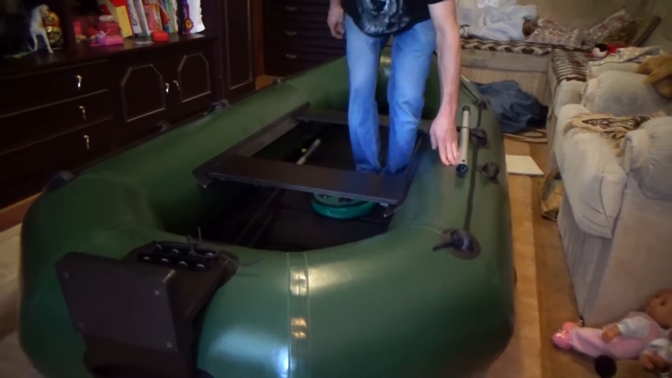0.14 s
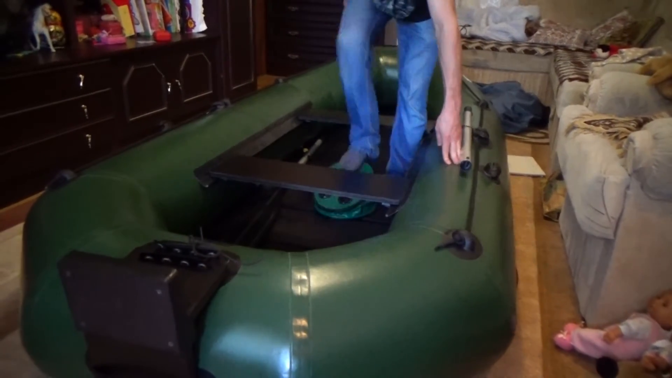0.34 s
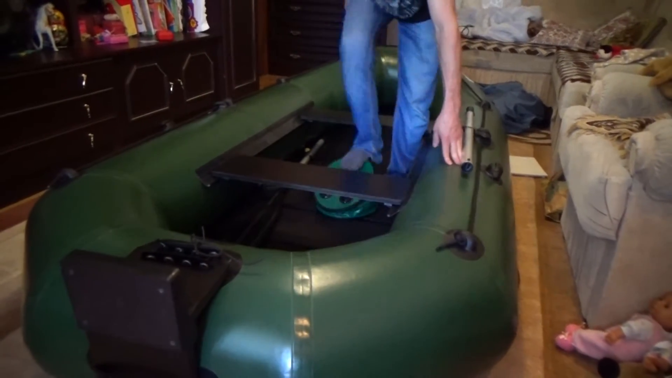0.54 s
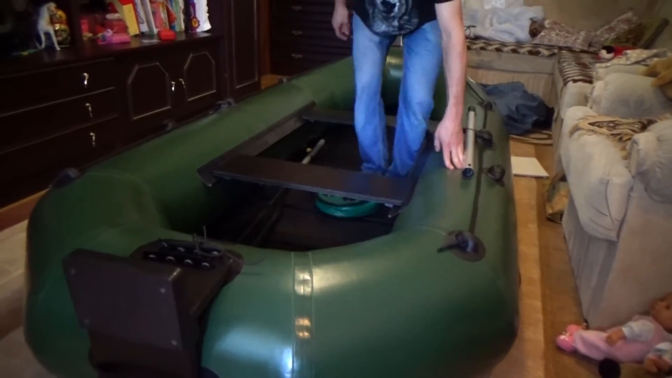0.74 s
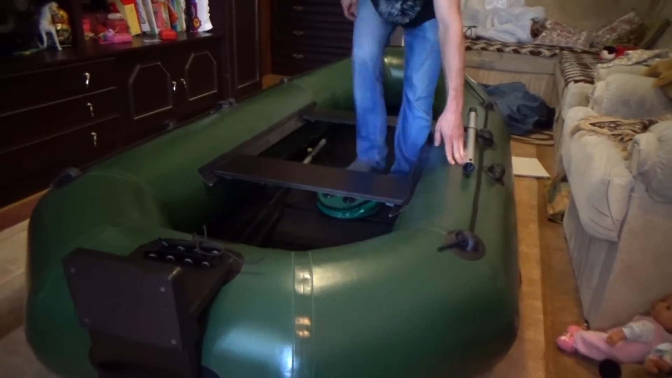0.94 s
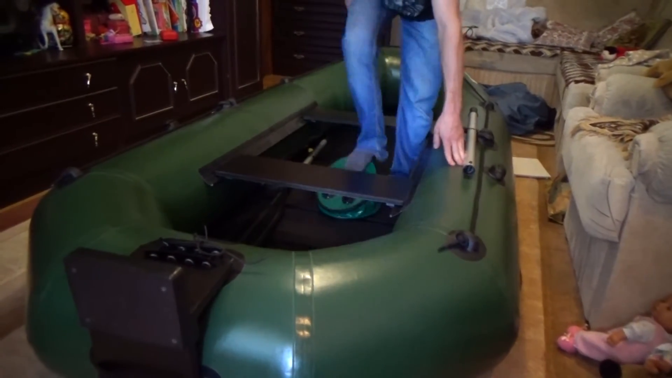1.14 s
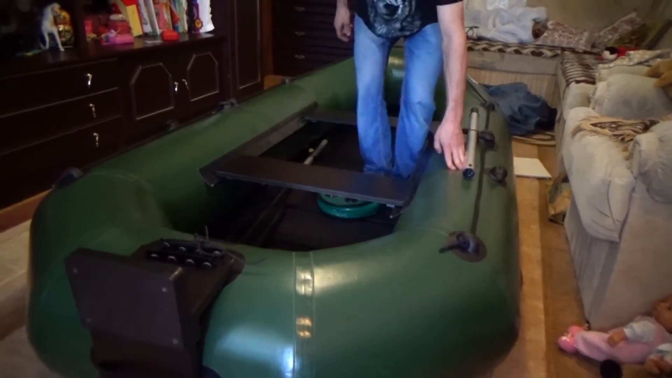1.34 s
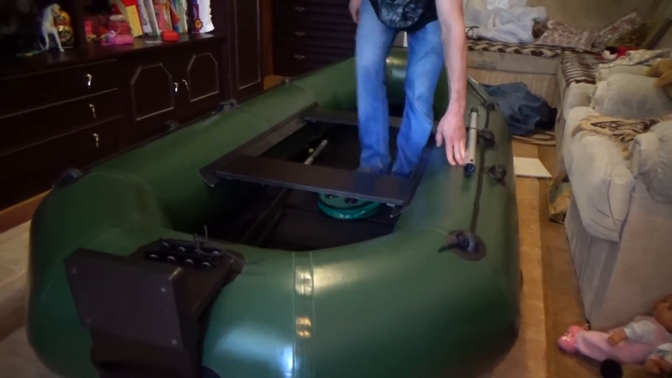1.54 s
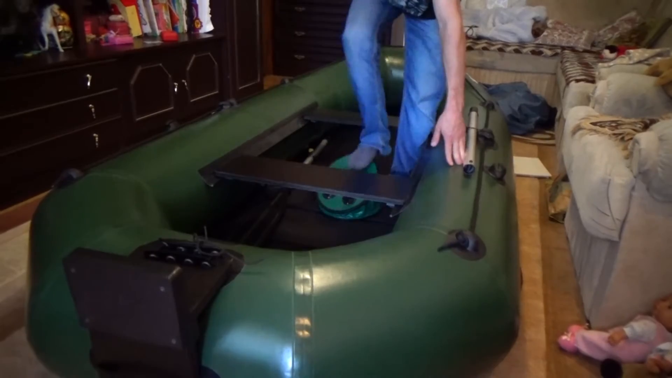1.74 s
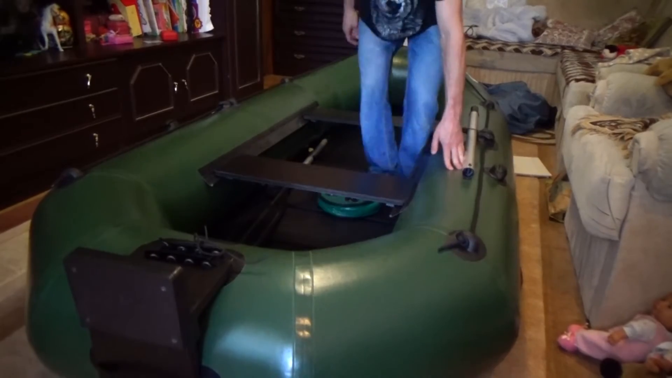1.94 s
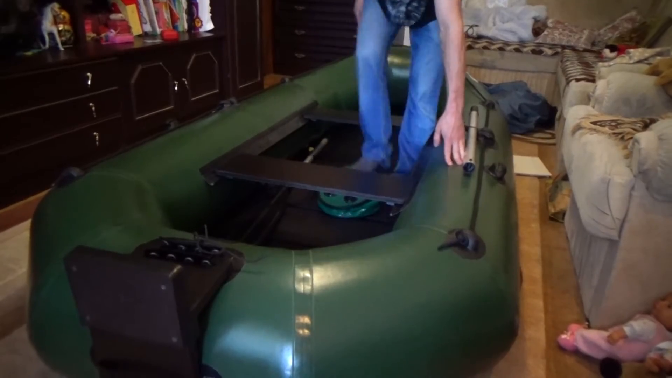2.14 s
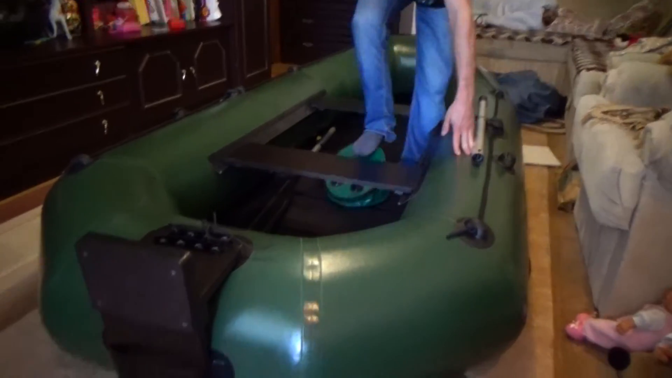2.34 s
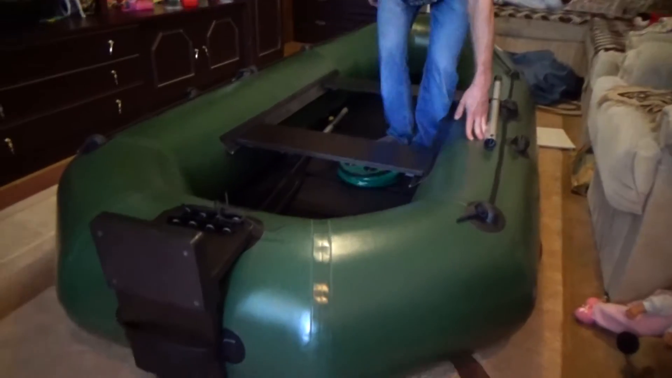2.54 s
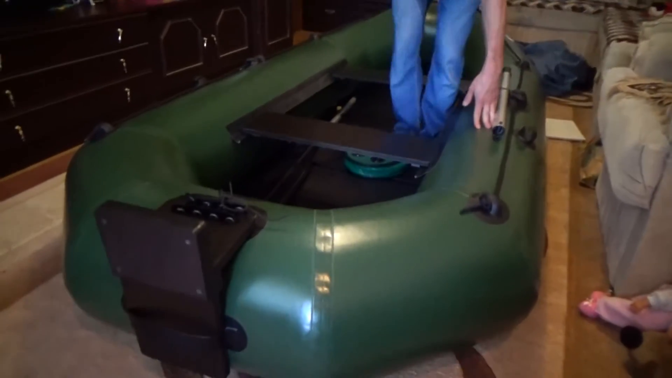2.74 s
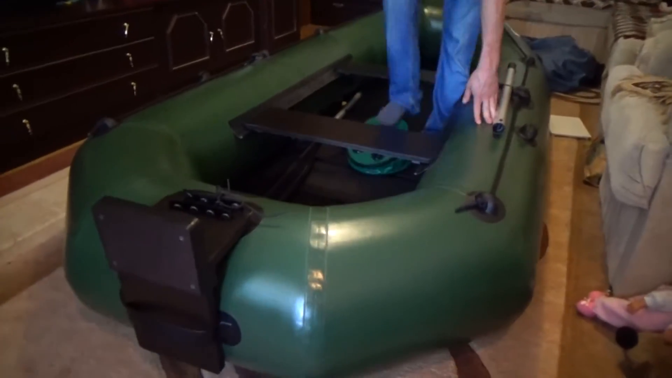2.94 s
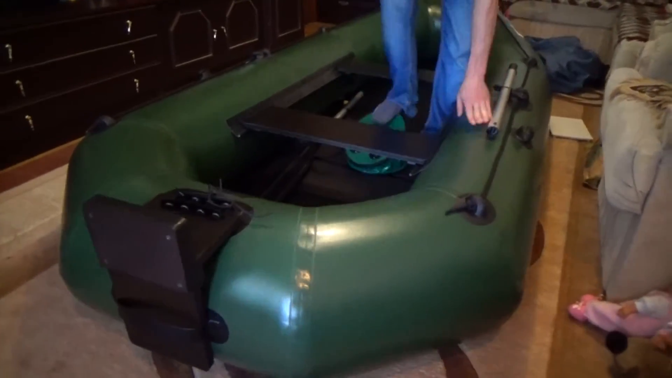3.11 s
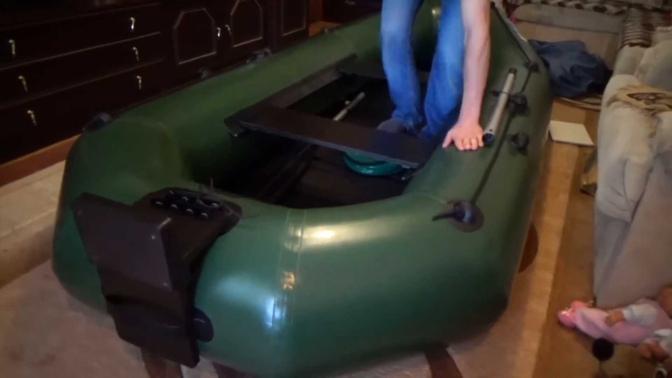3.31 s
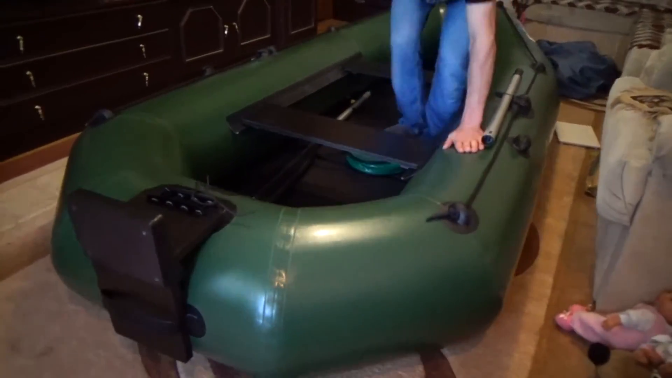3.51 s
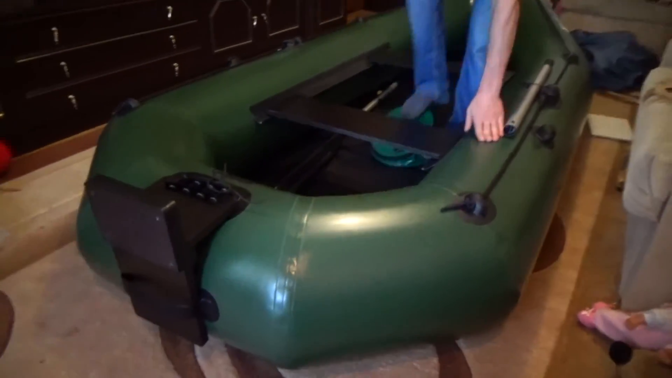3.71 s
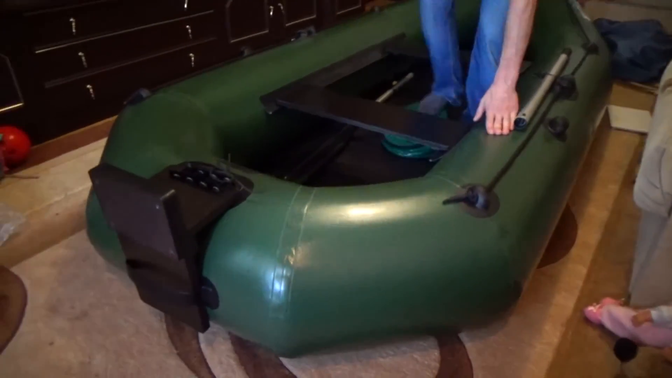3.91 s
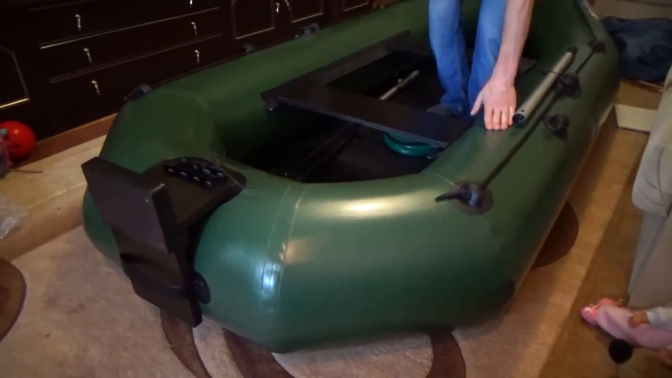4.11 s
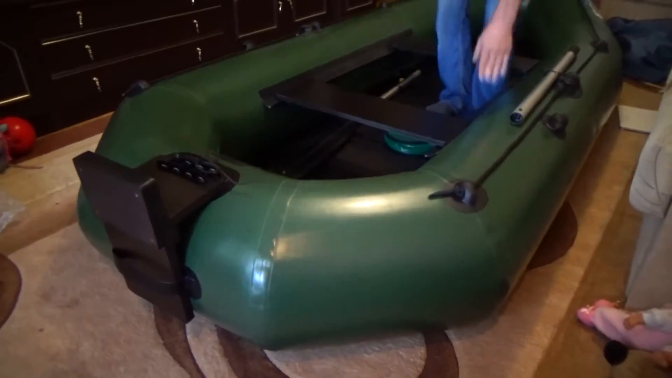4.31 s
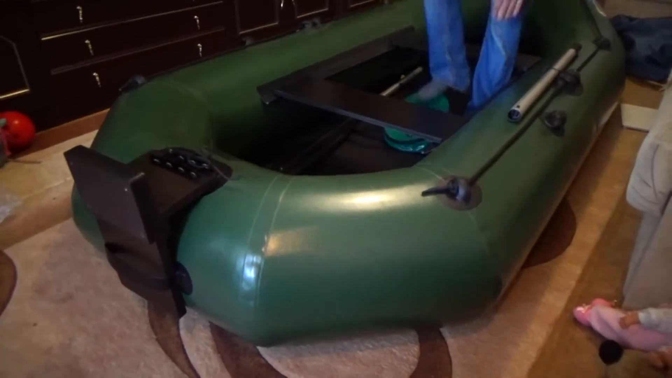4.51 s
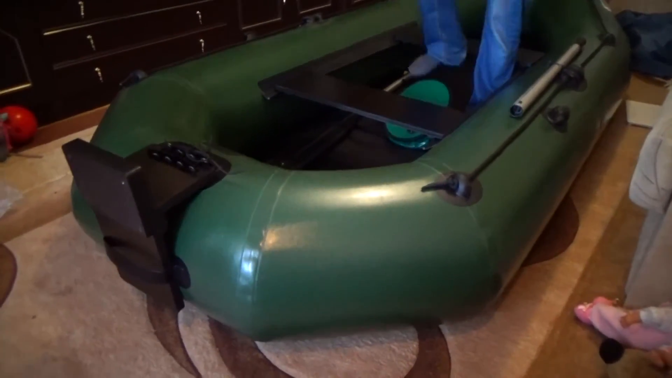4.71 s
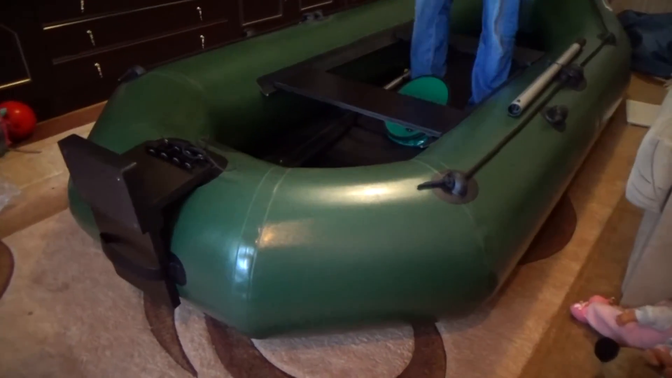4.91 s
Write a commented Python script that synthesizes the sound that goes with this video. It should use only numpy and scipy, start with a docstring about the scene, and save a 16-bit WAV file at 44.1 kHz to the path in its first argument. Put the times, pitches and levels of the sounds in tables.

```python
"""Foot pump and rubber boat

A bellows foot pump inflates a rubber boat in a furnished living room, seven presses, straight ahead.
Each press crumples the bellows (dense slips rung in the hull) and jets noisy air through a ribbed hose,
which whistles in sliding sine tones on its pipe modes, lower when the push is gentler. Each lift unfolds
the bellows and sucks air in. Buckling folds, rubs and plastic clicks intervene; the room answers softly."""
import sys
import numpy as np
from scipy import signal
from scipy.fft import rfft, irfft, next_fast_len
from scipy.io import wavfile
from scipy.ndimage import uniform_filter1d, minimum_filter1d, map_coordinates

SR = 44100
rng = np.random.default_rng(int(sys.argv[2]) if len(sys.argv) > 2 else 0)


def store_wav(level_fs):
    """Save 16-bit WAV to argv[1]."""
    pcm = np.round(np.clip(np.atleast_2d(level_fs), -1, 1) * 32767)
    wavfile.write(sys.argv[1], SR, pcm.T.astype(np.int16))


N = 223119

# All levels in the tables are relative: each layer has its own gain in the mix.
# foot coming up: start_s, bellows_db, swell_s, crumple_hold_s, intake_length_s, intake_db
FOOT_LIFTS = [ (-0.24, -24, .05, .03, 0.292, -24), (0.304, -16, 0.049, 0.017, 0.27, -28),
              (0.98, -13.5, 0.035, 0.026, 0.23, -29), (1.606, -14, 0.043, 0.031, 0.22, -28),
              (2.172, -15, 0.035, 0.049, 0.25, -29), (2.914, -14, 0.043, 0.048, 0.3, -27.5),
              (3.7, -14.5, 0.041, 0.038, .21, -28.5), (4.5, -15.5, 0.087, 0.028, .42, -31)]
# foot going down: start_s, bellows_db, crumple_hold_s, flow_rise_s, flow_fall_s, fall_taper (exponent),
# hiss_db, jet_db
FOOT_PRESSES = [ (0.0, -10, 0.024, .10, 0.25, 1.3, -24, -24.5),
                (0.597, -13.5, 0.031, 0.14, 0.26, 1.26, -23.5, -24.5),
                (1.216, -11.5, 0.02, 0.13, 0.31, 2, -22.5, -23.5),
                (1.833, -12, 0.032, .12, 0.28, 1.96, -21.5, -24),
                (2.449, -9.5, 0.018, 0.16, 0.34, 1.49, -21.5, -27),
                (3.201, -17.5, 0.047, 0.3, 0.25, 1.73, -23.5, -34.5),
                (3.929, -12, 0.031, 0.15, 0.52, 1.75, -22, -37)]
# the hose sings on a pipe mode: start_s, length_s, pitch_hz, level_db, fade_db_per_s, octave_db
HOSE_TONES = [ (0.096, 0.27, 4120, -13.5, 51, -5.5), (0.718, 0.25, 4136, -25, 23, 3.5),
              (0.728, 0.21, 3995, -16.5, 36, 0), (0.80, 0.079, 3866, -21, 6, -22),
              (1.322, 0.25, 4134, -22.5, 31, -12), (1.339, 0.073, 3980, -13, 20, -5.5),
              (1.388, .22, 3855, -18.5, 67, -20), (1.93, .25, 4124, -17, 32, -1),
              (1.928, 0.092, 3992, -21, 27, 2.5), (2.018, 0.017, 4105, -9, 10, -34),
              (2.57, 0.172, 3415, -15.5, 39, -11), (2.606, .165, 3153, -19.5, 28, -10),
              (3.445, 0.065, 2490, -28, 14, -17), (3.523, 0.071, 2428, -21.5, 140, -28),
              (4.086, 0.1, 2745, -27.5, 120, -13), (4.087, 0.041, 2590, -28, 10, -37),
              (4.088, 0.052, 2420, -32, 8.5, -24)]
# foot and hand rub on the pump and hull: start_s, length_s, low_db, creak_db
RUBBER_RUBS = [(0.448, 0.037, -16.5, -32), (3.151, 0.009, -14.5, -23), (3.293, 0.11, -30, -40),
               (3.565, 0.2, -28.5, -37.5), (4.144, 0.013, -22, -25), (4.19, 0.005, -19, -24),
               (4.395, 0.06, -30, -37)]
# a fold of the bellows buckles: start_s, level_db
FOLD_BUCKLES = [(0.607, -11.5), (1.203, 3), (1.825, -2), (2.44, -1.5), (3.196, -5), (3.911, -3.5),
                (5.012, -24.5)]
# the plastic pump and the fittings click: start_s, level_db, knock_db, treble_db
PLASTIC_CLICKS = [(0.646, -15.5, -21, -7), (1.2434, -15, -21, -3), (1.6194, -39, -1, -7),
                  (1.8019, -19, -9, 7.5), (1.856, -16, -21.5, -14.5), (2.168, -29.5, -15, -11),
                  (2.4897, -15, -17, -6), (2.9346, -10.5, 4, -1), (3.157, -8, -11, -26.5),
                  (3.25, -13.5, -10, 0.5), (3.342, -13, -10, -8), (3.4285, -13.5, -12.5, 1),
                  (3.6355, -17, -2, -15), (4.1356, -19, -16, -12), (4.1987, -18, 17, 5),
                  (4.394, -17, -3.5, -15), (4.4866, -17, -15, 2), (4.5424, -21, -18, 6.5),
                  (4.6134, -16, -11, 5.5)]
# resonances of the air-filled bellows: pitch_hz, level_db, t60_s
BELLOWS_MODES = [(138, -18, 0.14), (219, -1, 0.14), (254.6, 3.5, 0.18), (284, -7.5, 0.031),
                 (411.7, -5.5, 0.14), (641, -12, 0.071)]
# lowest resonances of boat and room: pitch_hz, level_db, t60_s
BOOM_MODES = [(132.7, -21, 0.5), (208.1, 0, 0.57), (251, -14.5, 0.39), (401, -25.5, 0.2)]
# resonances of boat and room that colour the rubber: centre_hz, width_hz, boost_db
HULL_RESONANCES = [(128.3, 11, 5), (208.4, 4.7, 6.5), (249, 34, 2), (311, 45, 2.5), (405.2, 21, 4.5),
                   (487, 72, 4.5), (604, 8.1, 3.5), (656.4, 30, 8.5)]
# spectrum of the bellows crumpling: frequency_hz, level_db
FOLDING_SPECTRUM = [(25, -79), (55, -20), (85, -21.5), (130, -2.5), (240, -3.5), (340, -3), (460, -5.5),
                    (700, -15.5), (950, -15), (1300, -23.5), (2700, -34), (5000, -46), (9000, -49)]
# spectrum of the bellows springing open: frequency_hz, level_db
UNFOLDING_SPECTRUM = [(24, -53), (40, -64), (64, -22), (93, -27.5), (122, -5), (233, 2.5), (312, -4.5),
                      (403, -4.5), (540, -10.5), (649, -16.5), (752, -16.5), (1030, -15), (1210, -24.5),
                      (1680, -22.5), (3200, -37.5), (4160, -57), (7040, -120)]
# spectrum of air sucked through the inlet: frequency_hz, level_db
INTAKE_SPECTRUM = [(410, -13.5), (700, 2), (767, -24), (829, -4), (1130, -1), (1230, -4.5), (1510, -3),
                   (2180, -4), (2820, -7), (4020, -7), (5790, -16.5), (7710, -7), (8900, -12.5),
                   (12200, -7.5), (15800, -14)]
# spectrum of the bright hiss of the outflow: frequency_hz, level_db
HISS_SPECTRUM = [(1500, -20), (4000, -18), (6000, -5), (7500, 0), (9000, 4), (11300, 0), (12300, 7.5),
                 (14000, 3), (16000, 0.5)]
# spectrum of the air jet: frequency_hz, level_db
JET_SPECTRUM = [(700, -22.5), (1300, -8), (2000, -10), (3000, 1), (4300, -1), (5200, -3.5), (7000, -3),
                (9000, -3.5), (14000, -10.5)]
# spectrum of the knocked plastic: frequency_hz, level_db
CASING_SPECTRUM = [(120, -36.5), (200, 7.5), (616, 8), (1060, -6), (1370, -4), (2120, -12), (2380, -13.5),
                   (2990, -15.5), (3300, -14.5), (3860, -24), (4140, -25), (4710, -24.5), (6000, -28),
                   (7800, -49), (13200, -120)]
# spectrum of the steady background noise: frequency_hz, level_db
BACKGROUND_SPECTRUM = [(25, -45), (60, -7), (120, 3.5), (250, -7), (600, 0.5), (1500, -1.5), (4000, -10.5),
                       (16000, -30)]
# reverberation of the living room: frequency_hz, t60_s
ROOM_DECAY = [(150, 0.23), (1000, 0.27), (4000, 0.49), (9000, 0.48), (15000, 0.11)]
# stereo spread: frequency_hz, side_db
SIDE_SPECTRUM = [(70, 7), (150, -20), (500, -15), (1200, -24.5), (2400, -48), (4000, -27), (8000, -12),
                 (12000, -31.5)]

FOLD_RISE_DB_PER_S, FOLD_FALL_DB_PER_S = 438, 219  # crumpling under the foot
UNFOLD_START_DB, UNFOLD_FALL_DB_PER_S = -9.5, 250  # the bellows spring open, swell and settle
RUB_RISE_DB_PER_S, RUB_FALL_DB_PER_S = 1200, 302  # this rise also serves the unfolding
SETTLE_DB, SETTLE_DB_PER_S = -29.5, 20  # the rubber keeps stirring faintly after each movement
JET_GROWS, CREASE_GROWS = 1.02, 0.91  # exponents: jet against flow, small creases against big folds
INTAKE_SAG_DB_PER_S, INLET_CLOSE_S = 48, 0.033  # suction fades as the bellows fill
SHARP_HZ, SHARP_SETTLES_S = 41.3, 0.027  # each tone starts sharp and slides down onto its mode
SWELL_S = 0.025  # longest build-up of a tone in the hose, counted from its nominal start
# the octave is strongest early in a tone, then fades to a faint floor
OCTAVE_HOLD_S, OCTAVE_FADE_DB_PER_S, OCTAVE_LEAST_DB = 0.026, 218, -27
TOP_HZ = 15900  # upper band limit


def amp(db):
    """Decibels to gain."""
    return 10 ** (np.asarray(db) / 20)


def unit(x):
    """Scale to rms 1."""
    return x / np.sqrt(np.mean(x ** 2) + 1e-20)


def along(points, hz):
    """Interpolate (Hz, value) points on a logarithmic frequency axis."""
    f, v = np.transpose(points)
    return np.interp(np.log(hz + 1), np.log(f), v)


def since(s):
    """Seconds since s, for every sample."""
    return np.arange(N) / SR - s


def wobble(rate, size=N):
    """A smooth random curve with rate knots a second."""
    knots = rng.standard_normal(int(size * rate / SR) + 4)
    return map_coordinates(knots, [np.arange(size) * rate / SR])


def coloured(x, gain_db):
    """Filter x causally (minimum phase) with a gain in dB given as a function of frequency."""
    m = 2 * next_fast_len(x.shape[-1] // 2 + 4096)
    cepstrum = irfft(np.log(amp(gain_db(np.fft.rfftfreq(m, 1 / SR))) + 1e-6), m)
    # folding the cepstrum forward in time makes the filter causal
    cepstrum[1:m // 2] *= 2
    cepstrum[m // 2 + 1:] = 0
    return irfft(rfft(x, m) * np.exp(rfft(cepstrum)), m)[..., :x.shape[-1]]


def rush(spectrum):
    """Turbulent air as shaped noise of rms 1."""
    return unit(coloured(rng.standard_normal(N), lambda hz: along(spectrum, hz)))


def add(track, s, sound):
    """Mix a sound into the track at s seconds."""
    part = track[max(round(s * SR), 0):][:len(sound)]
    part += sound[:len(part)]


def movement(t, hold, rise, fall):
    """Gain of moving rubber: rise and fall in dB per s around a hold, then faint settling."""
    before, after = np.maximum(-t, 0), np.maximum(t - hold, 0)
    settling = amp(SETTLE_DB - SETTLE_DB_PER_S * after)
    return amp(-rise * before) * np.maximum(amp(-fall * after), settling)


def crumple(spectrum, rate, spread_db, rub):
    """Dense slips of the rubber ring in the hull: big folds sound low, small creases higher."""
    sizes = amp(spread_db * rng.standard_normal(N))
    slips = (rng.random(N) < rate / SR) * rng.choice([-1, 1], N) * sizes  # rate in slips per s
    drive = unit(slips) + rub * rng.standard_normal(N)

    def hull(hz):
        """Rubber spectrum in dB with the resonances of boat and room on top."""
        peaks = sum(db / (1 + (2 * (hz - centre) / width) ** 2) for centre, width, db in HULL_RESONANCES)
        return along(spectrum, hz) + peaks

    low_tilt = [(440, 19), (600, -22.0), (1000, -3.5)]
    high_tilt = [(250, -22.0), (420, -19.5), (540, 15)]
    folds = coloured(drive, lambda hz: hull(hz) + along(low_tilt, hz))
    creases = coloured(np.roll(drive, SR // 200), lambda hz: hull(hz) + along(high_tilt, hz))
    return unit(folds), unit(creases)


def lift():
    """The spring unfolds the bellows while air is sucked through the inlet."""
    unfolding, intake = 0, 0
    for s, db, swell, hold, length, intake_db in FOOT_LIFTS:
        t = since(s)
        opening = np.clip(t / swell, 0, 1)
        stir = movement(t, swell + hold, RUB_RISE_DB_PER_S, UNFOLD_FALL_DB_PER_S)
        unfolding = unfolding + amp(db + UNFOLD_START_DB * (1 - opening)) * stir
        closing = np.clip((length - t) / INLET_CLOSE_S, 0, 1)
        suction = amp(intake_db - INTAKE_SAG_DB_PER_S * np.maximum(t - swell, 0))
        intake = intake + suction * opening ** 1.1 * closing
    folds, creases = crumple(UNFOLDING_SPECTRUM, rate=800, spread_db=3.0, rub=0.5)
    air = amp(4.5 + 0.75 * wobble(50)) * intake * rush(INTAKE_SPECTRUM)
    return amp(-0.5) * unfolding * folds + amp(-11) * unfolding ** CREASE_GROWS * creases + air


def airflow():
    """Gains of hiss and jet: flow builds as the foot sinks and tapers off as the bellows empty."""
    hiss, jet = 0, 0
    for s, _, _, rise, fall, taper, hiss_db, jet_db in FOOT_PRESSES:
        t = since(s)
        sinking = np.clip(t / rise, 0, 1)
        emptying = np.clip(1 - (t - rise) / fall, 0, 1) ** taper
        flow = np.sin(np.pi / 2 * sinking) ** 1.09 * emptying
        hiss = hiss + amp(hiss_db) * flow
        jet = jet + amp(jet_db) * flow ** JET_GROWS * sinking ** 2.04
    return hiss, jet


def press(hiss, jet):
    """The bellows fold, then air jets through the valve; a slackening jet loses its lower roar first."""
    folding = sum(amp(db) * movement(since(s), hold, FOLD_RISE_DB_PER_S, FOLD_FALL_DB_PER_S)
                  for s, db, hold, *_ in FOOT_PRESSES)
    creasing = np.pad(folding, (int(0.0073 * SR), 0))[:N] ** CREASE_GROWS  # creases lag by 7.3 ms
    folds, creases = crumple(FOLDING_SPECTRUM, rate=590, spread_db=2.0, rub=0.63)
    flow = jet / jet.max()
    roar_spectrum = [(900, -35.5), (1300, -5.5), (1800, 6), (2800, 4.5), (4500, -11)]
    roar = flow ** 1.47 * amp(-24.5) * rush(roar_spectrum)
    air = amp(-2.5) * hiss * rush(HISS_SPECTRUM) + amp(4) * jet * rush(JET_SPECTRUM) + roar
    rubber = amp(-5.0) * folding * folds + amp(-13.5) * creasing * creases
    return rubber + air * amp(0.15 * wobble(42))


def whistle(jet, edge=.014, flutter_db=3.0, spacing_hz=138, side_tone_db=-11, breath_db=-10):
    """The hose slides onto a pipe mode and fades there; the tone clears as the jet slackens."""
    out = np.zeros(N)
    for start, length, hz, db, fade, octave_db in HOSE_TONES:
        size = int((length + 2 * edge) * SR)
        t = np.arange(size) / SR - edge
        flow = np.interp((start + t) * SR, np.arange(N), jet / jet.max())
        building = (t + edge) / (edge + min(SWELL_S, length / 2))
        ending = (length + edge - t) / (2 * edge)
        swell = np.sin(np.pi / 2 * np.clip(np.minimum(building, ending), 0, 1)) ** 1.3

        jitter = .005 * flow ** .5 * wobble(220, size)
        sharp = SHARP_HZ * np.exp(-np.maximum(t, 0) / SHARP_SETTLES_S)
        phase = 2 * np.pi * np.cumsum(hz * (1 + jitter) + sharp) / SR

        # a strong jet also roughens the tone with wavering side tones and a breathy skirt
        side_tones = 0
        for k in (-3.5, -2.1, -0.22, 3.7):  # offset in units of spacing_hz
            level = amp(side_tone_db * abs(k) ** .5) * (1 + wobble(45, size))
            offset = 2 * np.pi * (k * spacing_hz * t + rng.random())
            side_tones = side_tones + level * np.sin(phase + offset)
        skirt = wobble(851, size) * np.sin(phase) + wobble(799, size) * np.cos(phase)
        breath = amp(breath_db) * skirt

        shiver = 1.1 * flow * wobble(350, size)
        octave_fade = OCTAVE_FADE_DB_PER_S * np.maximum(t - OCTAVE_HOLD_S, 0)
        overblow = amp(OCTAVE_LEAST_DB) + amp(octave_db - octave_fade)
        octave = overblow * amp(1.5 * wobble(133, size)) * np.sin(2 * phase + shiver)

        tone = np.sin(phase) + flow * (side_tones + breath) + octave
        level = amp(db - fade * t + flutter_db * wobble(135, size))
        add(out, start - edge, swell * level * tone)
    return amp(1.5) * out


def rubs():
    """Short scuffs of foot and hand make the rubber slip, mostly during the last two presses."""
    folds, creases = crumple(FOLDING_SPECTRUM, rate=680, spread_db=1.5, rub=0.48)
    out = 0
    for s, length, low_db, creak_db in RUBBER_RUBS:
        scuff = amp(low_db - 9) * folds + amp(creak_db - 4.0) * creases
        out = out + movement(since(s), length, RUB_RISE_DB_PER_S, RUB_FALL_DB_PER_S) * scuff
    return out


def buckles(attack=.005):
    """A fold gives way under the foot and the air-filled bellows boom briefly in decaying sines."""
    out, t = np.zeros(N), np.arange(SR // 3) / SR
    for s, db in FOLD_BUCKLES:
        ring = 0
        for hz, level, t60 in BELLOWS_MODES:
            decay = amp(level + rng.standard_normal() - 60 * t / t60)  # each mode varies by about 1 dB
            ring = ring + decay * np.sin(2 * np.pi * (hz * t + rng.random()))
        ring = ring * (1 - np.exp(-t / attack))
        add(out, s, amp(db - 4) * ring / np.abs(ring).max())
    return out


def clicks(t60=0.054):
    """Dry knocks of hard plastic: decaying noise with its own weight, plus a shorter treble crack."""
    out, t = np.zeros(N), np.arange(SR // 8) / SR
    for s, db, knock_db, treble_db in PLASTIC_CLICKS:
        burst = rng.standard_normal(len(t)) * amp(-60 * t / t60)
        weight = [(600, knock_db), (1200, 0)]
        body = coloured(burst, lambda hz: along(CASING_SPECTRUM, hz) + along(weight, hz))
        edge = [(2000, -17), (5000, -1), (15000, 2.0)]
        crack = coloured(burst * amp(-500 * t), lambda hz: along(edge, hz))
        add(out, s, amp(db - 19) * unit(body) + amp(db + treble_db - 28.5) * unit(crack))
    return out


def boom(x):
    """The lowest resonances of boat and room ring on after the foot comes down."""
    t = np.arange(SR // 2) / SR
    ring = 0
    for hz, db, t60 in BOOM_MODES:
        resonance_scale = 2 * np.log(1000) / t60  # equal peak response whatever the decay
        ring = ring + amp(db - 60 * t / t60) * resonance_scale * np.cos(2 * np.pi * hz * t)
    return signal.fftconvolve(x, ring / SR)[:N]


def room(x, delay=.004):
    """The room's diffuse answer: a noise tail in which each frequency dies at its own speed."""
    hz, t, z = signal.stft(rng.standard_normal(SR // 2), SR, nperseg=256)
    decay = amp(-60 * t / along(ROOM_DECAY, hz)[:, None])
    tail = signal.istft(z * decay, SR, nperseg=256)[1]
    delayed = np.pad(x, (int(delay * SR), 0))
    return signal.fftconvolve(delayed, tail / np.linalg.norm(tail))[:N]


def scene():
    """The pump straight ahead of the microphone, nearly mono, widest in the deep bass."""
    hiss, jet = airflow()
    tones, knocks = whistle(jet), clicks()
    down = press(hiss, jet) + buckles()
    pump = down + lift() + rubs()
    to_room = amp(-5.5) * tones + amp(-3.0) * knocks + amp(-8.0) * pump
    background = amp(-47.5) * rush(BACKGROUND_SPECTRUM)
    mid = pump + boom(down) + tones + knocks + room(to_room) + background
    late_mid = np.pad(mid, (SR // 300, 0))[:N]  # about 3.3 ms late
    side = coloured(0.15 * room(mid) + 0.7 * late_mid, lambda hz: along(SIDE_SPECTRUM, hz))
    return np.array([mid + side, mid - side])


def record(dry):
    """The microphone chain limits the highest peaks, thins the deep bass and stops at TOP_HZ."""
    ceiling, hold = .75, SR // 200
    needed = np.minimum(1, ceiling / (np.abs(dry).max(axis=0) + 1e-9))
    limited = dry * uniform_filter1d(minimum_filter1d(needed, 2 * hold), hold)
    m = next_fast_len(N + SR // 2)
    hz = np.fft.rfftfreq(m, 1 / SR)
    bass_cut = hz / np.hypot(hz, 40)  # corner at 40 Hz
    return irfft(rfft(limited, m) * bass_cut * (hz < TOP_HZ), m)[:, :N]


dry = scene()
out = record(dry)
store_wav(out)
```